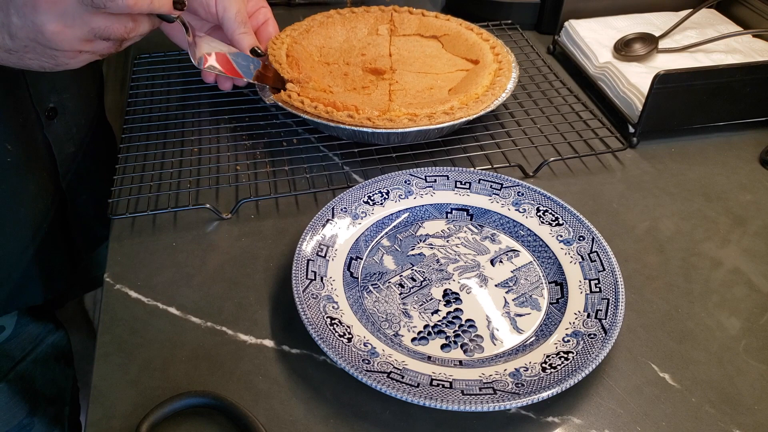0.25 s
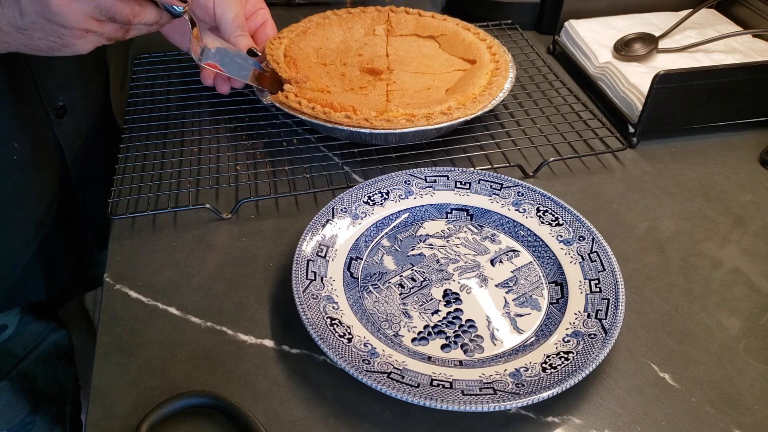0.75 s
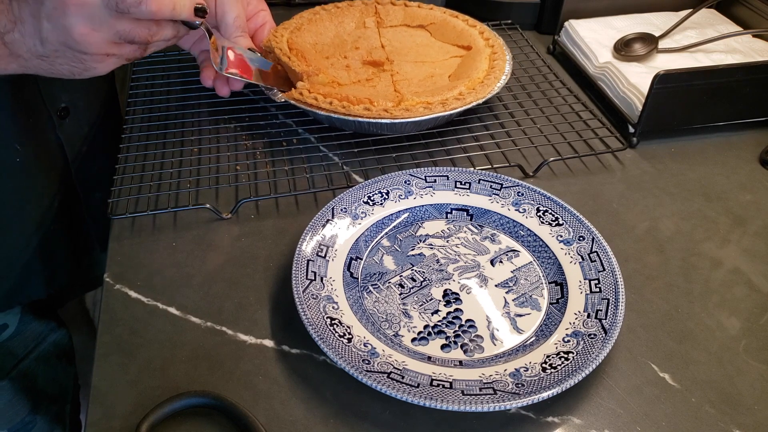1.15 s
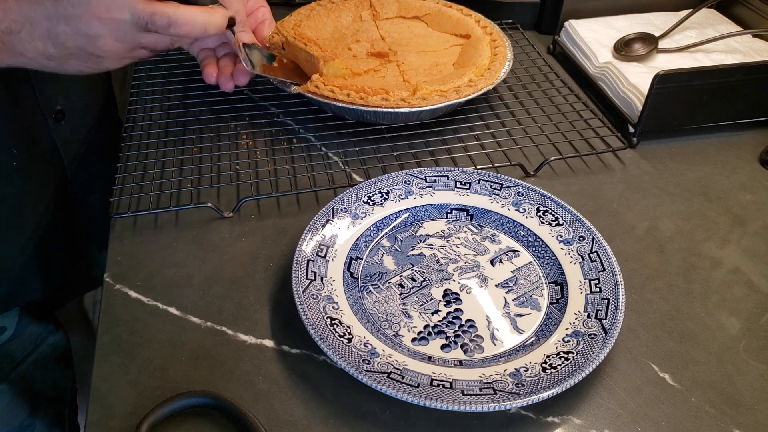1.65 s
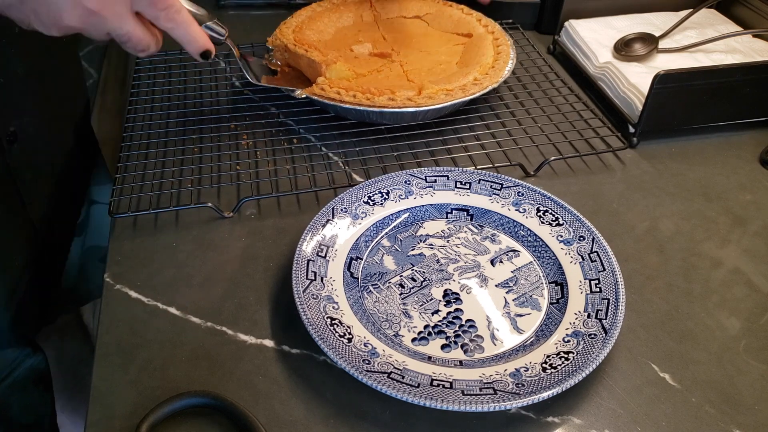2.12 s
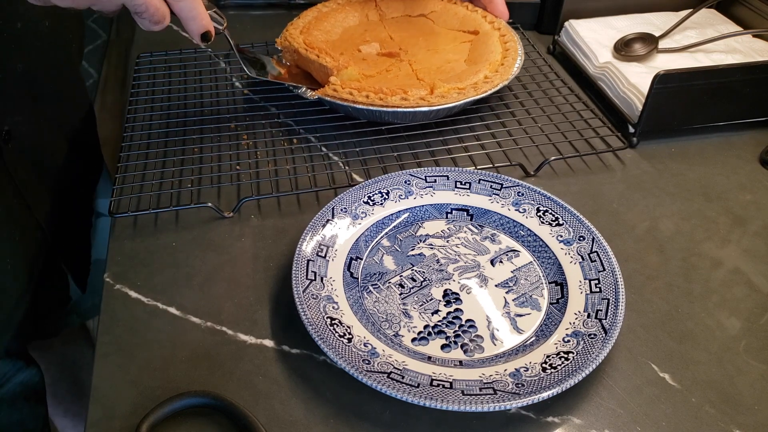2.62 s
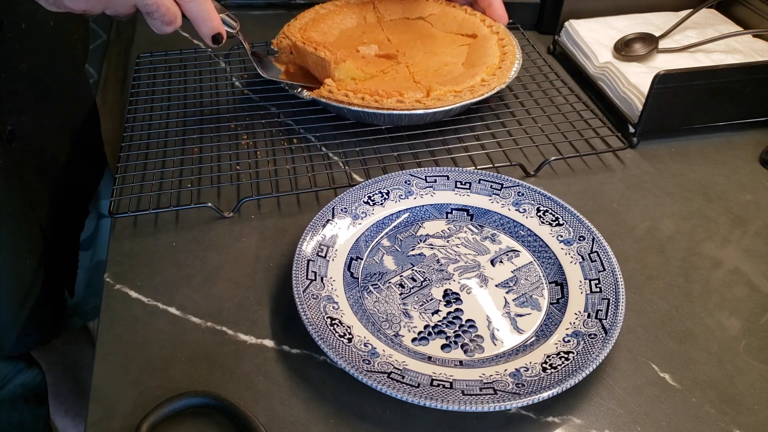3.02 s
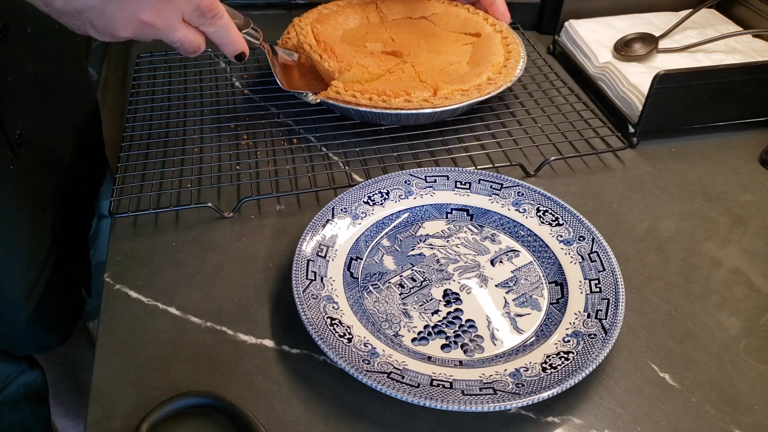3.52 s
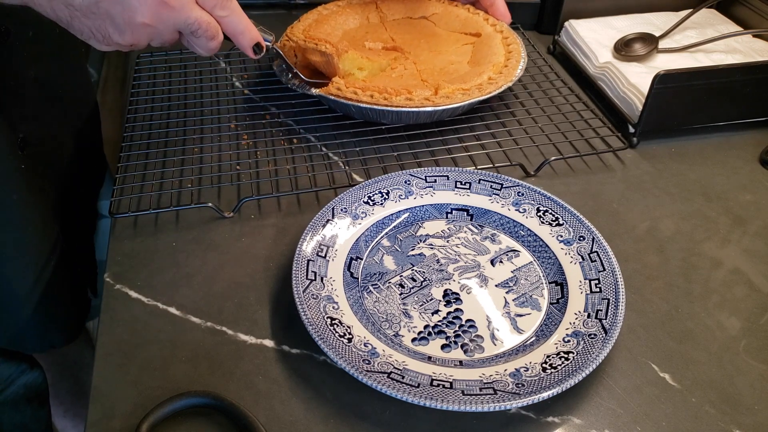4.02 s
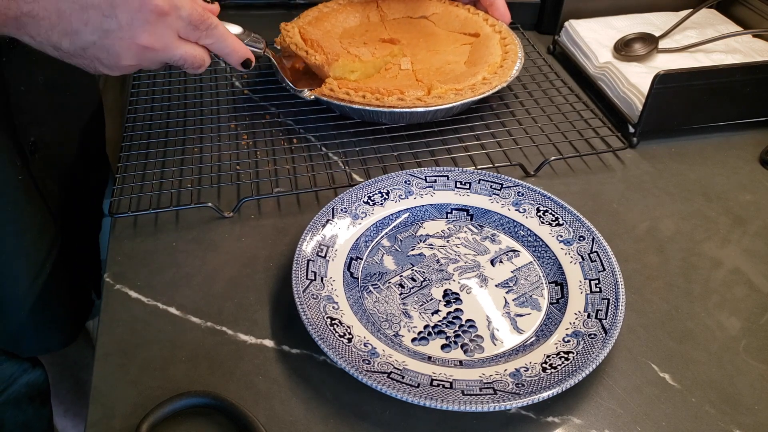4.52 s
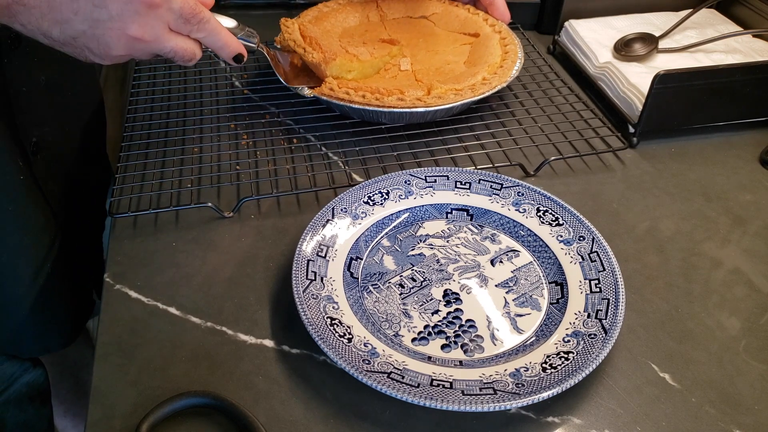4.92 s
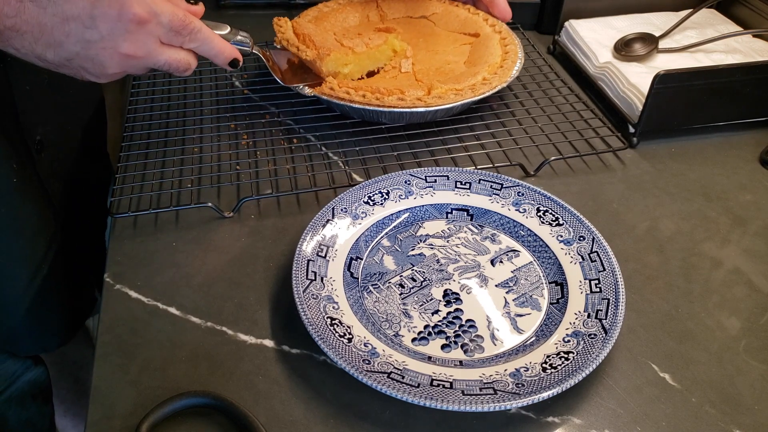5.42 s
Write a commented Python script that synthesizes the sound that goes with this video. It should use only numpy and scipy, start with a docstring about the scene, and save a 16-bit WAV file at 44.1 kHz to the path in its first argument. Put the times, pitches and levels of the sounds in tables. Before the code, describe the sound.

A metal server works under a slice of pie in a foil tin, close to the microphones and slightly left, in a quiet kitchen. It opens with a bright foil snap and a tiny steel clink. For the first two seconds, short scrapes crinkle the foil, hiss against the crust and break crumbs, dotted with sharp, irregular pops as dents flip. The blade squeaks very faintly on the rim, and the tin bumps softly on a wire rack. The strongest pop comes at about 2.2 seconds, followed by more scraping and smaller clicks. Another crisp snap lands at 3.2, a pop with a rack knock at 3.7, and two clear pops at 4.3 and 4.5. The scraping then dwindles to faint crust ticks, with a last small click around 5 seconds. The pops have a short room tail, and an appliance rumbles low throughout.

```python
"""A quiet kitchen, two microphones close to a pie in a foil tin, the tin a little to the left.
A metal server works under a slice: dents in the foil flip with a pop, and tiny slips of the blade
crinkle the foil, hiss on the crust and break crumbs. The blade sings on the rim, the tin bumps a rack.
The kitchen answers with a short tail, and an appliance rumbles low in the background."""
import sys
import numpy as np
from scipy import signal
from scipy.io import wavfile
from scipy.ndimage import uniform_filter1d

SR = 44100
rng = np.random.default_rng(int(sys.argv[2]) if len(sys.argv) > 2 else 0)


def inscribe(sig):
    """Save sig as 16-bit PCM at rate SR to the path in sys.argv[1].

    A 1-D sig is mono; a 2-D sig holds one channel per row.
    Samples are clipped to [-1, 1] before scaling.
    """
    pcm = np.round(np.clip(np.atleast_2d(sig).T, -1, 1) * 32767)
    wavfile.write(sys.argv[1], SR, pcm.astype(np.int16))


N = 249515
LEAD_SAMPLES = 4  # the left microphone hears the tin first
SHADE_DB = -2  # the camera body shades the left microphone from hiss and snaps


def gain_of(db):
    """Decibels to gain."""
    return 10 ** (np.asarray(db) / 20)


def unit_rms(x):
    """Scales to rms 1."""
    return x / np.sqrt(np.mean(x ** 2) + 1e-20)


def curve_at(points, hz):
    """Reads a table on a log-frequency axis."""
    f, value = np.transpose(points)
    return np.interp(np.log(hz + 1), np.log(f + 1), value)


def colour(x, spectrum, modes=()):
    """Minimum-phase filter of unit energy: a spectrum with resonance peaks on it."""
    hz = abs(np.fft.fftfreq(4096, 1 / SR))
    db = curve_at(spectrum, hz) + sum(top / (1 + (2 * (hz - f) / width) ** 2) for f, width, top in modes)
    log_gain = np.log(gain_of(np.maximum(db, -100)))
    taps = np.fft.ifft(np.exp(log_gain - 1j * signal.hilbert(log_gain).imag)).real[:2048]
    taps = taps.reshape((1,) * (x.ndim - 1) + (-1,)) / np.linalg.norm(taps)
    return signal.oaconvolve(x, taps, axes=-1)[..., :x.shape[-1]]


def slow_noise(shape, samples):
    """Noise smoothed twice over so many samples."""
    return uniform_filter1d(uniform_filter1d(rng.standard_normal(shape), samples), samples)


def add(mix, start_s, sound):
    """Mixes a sound in; a mono one reaches both microphones alike."""
    sound = np.atleast_2d(sound)
    part = mix[:, round(start_s * SR):][:, :sound.shape[1]]
    part += sound[:, :part.shape[1]]


# The kitchen at rest. Each row: frequency in Hz, relative level in dB.
ROOM_SPECTRUM = [(8.8, -39), (15, -41.5), (36, -18), (74, -2), (195, -15.5), (276, -18), (310, -19.5),
                 (453, -28.5), (494, -28.5), (787, -26.5), (1120, -33), (1210, -21), (1320, -31),
                 (1490, -38), (3790, -47.5), (7850, -68), (15800, -41.5)]
# How alike the microphones hear it. Each row: frequency in Hz, correlation.
ROOM_LIKENESS = [(60, 1), (180, 0.82), (550, 0.51), (1650, -0.72), (4970, 0.11), (15000, 0.026)]
# Which way it leans. Each row: frequency in Hz, left over right in dB.
ROOM_BALANCE = [(60, -2.0), (240, -4), (950, 4), (3770, 3.0), (15000, 4)]


def room_tone(level_db=-45, motor_hz=117, motor_width_hz=26, motor_db=10):
    """Rumble and faint hiss, nearly mono in the bass; an appliance's motor raises one narrow band."""
    frames, hz = N // 512 + 5, np.fft.rfftfreq(2048, 1 / SR)
    a, b, c, d, flicker = rng.standard_normal((frames, 1025, 5)).T
    flicker_db = 1.08 * unit_rms(uniform_filter1d(uniform_filter1d(flicker, 12, 0), 8, 1))
    likeness = np.clip(curve_at(ROOM_LIKENESS, hz), -1, 1)[:, None]
    left = a + 1j * b
    right = likeness * left + np.sqrt(1 - likeness ** 2) * (c + 1j * d)
    side_db = np.array([.5, -.5])[:, None, None] * curve_at(ROOM_BALANCE, hz)[:, None]
    hum_db = motor_db / (1 + (2 * (hz - motor_hz) / motor_width_hz) ** 2)
    band_db = (curve_at(ROOM_SPECTRUM, hz) + hum_db)[:, None]
    spectra = np.array([left, right]) * gain_of(band_db + side_db + flicker_db)
    return gain_of(level_db) * unit_rms(signal.istft(spectra, nperseg=2048, noverlap=1536)[1][:, :N])


# The kitchen's tail. Each row: frequency in Hz, seconds to fall 60 dB.
TAIL_DECAY = [(500, 0.41), (1500, 0.32), (4000, 0.49), (12000, 0.24)]
# Counter, plate and wall, close by. Each row: delay in seconds, level in dB.
NEAR_ECHOES = [(.003, -13), (.008, -11.5), (0.0156, -13.5), (.023, -26)]


def kitchen_reverb(x):
    """A few near echoes, and sparse reflections of random sign, each band dying at its own speed."""
    taps = np.zeros((2, SR // 2))
    arrivals = np.arange(400, SR // 2 - 20, 20) + rng.integers(0, 20, (2, (SR // 2 - 401) // 20))
    np.put_along_axis(taps, arrivals, rng.choice([-1., 1.], arrivals.shape), 1)
    hz, t, spectra = signal.stft(taps, SR, nperseg=256)
    decay = gain_of(-60 * t / curve_at(TAIL_DECAY, hz)[:, None])
    tail = signal.istft(spectra * decay, SR, nperseg=256)[1]
    tail *= gain_of(-11) / np.linalg.norm(tail[0])
    for delay_s, db in NEAR_ECHOES:
        delays = np.round(delay_s * SR * rng.uniform(.95, 1.05, 2)).astype(int)
        tail[[0, 1], delays] += gain_of(db)
    return signal.fftconvolve(x, tail, axes=1)[:, :N]


# The wire rack under the tin. Each row: start in seconds, level in dB.
RACK_BUMPS = [(0.056, -38), (0.317, -43), (0.614, -41), (0.695, -36), (1.124, -35.5), (1.303, -39),
              (1.672, -46), (2.653, -41), (2.956, -46), (3.555, -34), (3.661, -26.5), (4.294, -39)]


def rack_bump(db, hz=520, t60=.022):
    """The tin bumps the rack: a short low thump."""
    t = np.arange(2000) / SR
    return np.sin(2 * np.pi * hz * t) * gain_of(db - 60 * t / t60) * (1 - np.exp(-t / .00063))


# The server's steel modes. Each row: pitch in Hz, relative level in dB, seconds to fall 60 dB.
STEEL_MODES = [(6130, 4, 0.036), (9300, -7, .05), (12100, -14, .04), (14600, -15, 0.037)]


def server_clink(level_db):
    """A ring taps the server once and its modes die away."""
    t = np.arange(3000) / SR
    modes = sum(gain_of(db - 60 * t / t60) * np.sin(2 * np.pi * hz * t) for hz, db, t60 in STEEL_MODES)
    return gain_of(level_db) * modes


# At the rim of the tin. Each row: start and end in seconds, pitch in Hz, level in dB.
RIM_SQUEAKS = [(.135, 0.201, 1492, -47), (.7, 0.794, 12500, -71.5), (0.722, 1.102, 8300, -72),
               (1.097, 1.26, 8180, -61.5), (2.197, 2.323, 4370, -64)]


def rim_squeak(start_s, end_s, hz, db):
    """The blade sings on the rim, thin and wavering: slow noise carried on one pitch."""
    t = np.arange(start_s, end_s, 1 / SR)
    a, b = slow_noise((2, 2, len(t)), 180)
    tone = a * np.cos(2 * np.pi * hz * t) + b * np.sin(2 * np.pi * hz * t)
    return gain_of(db) * unit_rms(tone) * signal.windows.tukey(len(t), .4)


# The crust up close. Each row: start in seconds, centre in Hz, level in dB, seconds to fall 60 dB.
CRUST_TICKS = [(3.811, 14000, -44, .05), (3.915, 7800, -60.5, 0.32), (3.996, 11800, -54, .04),
               (4.42, 12000, -54, .02), (4.782, 11000, -56.5, 0.033), (5.096, 15000, -43.5, .07)]


def crust_tick(hz, db, t60):
    """A flake of crust snaps: a dying puff of noise in one high band."""
    t = np.arange(5000) / SR
    band = [(.6 * hz, -40), (.9 * hz, -4), (1.22 * hz, -4), (1.8 * hz, -30)]
    return colour(rng.standard_normal((2, len(t))), band) * gain_of(db - 60 * t / t60)


# The patch of foil under the blade. Each row: time in seconds, pitch in Hz.
PATCH_PITCH = [(0.0, 1500), (0.35, 1380), (0.49, 1830), (0.84, 1210), (1.01, 1440), (1.28, 1190),
               (1.32, 1600), (1.67, 1130), (1.83, 1560), (2.41, 1280), (2.49, 1920), (2.57, 1320),
               (2.65, 1950), (2.76, 1410), (2.91, 1700), (3.09, 1290), (5.61, 1160), (5.66, 1270)]


def patch_ring(x, width_hz=380):
    """A resonance that glides as the bending foil tightens and slackens."""
    hz = np.interp(np.arange(N) / SR, *np.transpose(PATCH_PITCH))
    carrier = np.exp(2j * np.pi * np.cumsum(hz) / SR)
    pole = np.exp(-np.pi * width_hz / SR)
    # shift down to 0 Hz, smooth, shift back
    return 2 * (carrier * signal.lfilter([1 - pole], [1, -pole], x / carrier)).real


# The server's pushes. Each row: start, rise and hold in seconds, crinkle and hiss levels in dB.
BLADE_STROKES = [(0.0, .002, .005, -41, -44), (0.11, .17, .09, -47, -49), (0.47, .06, .12, -49, -52),
                 (0.675, .02, .07, -44, -47), (0.88, .02, .38, -50, -55), (1.04, .03, .01, -48, -50),
                 (1.28, .03, .01, -43, -52), (1.44, .04, .02, -54, -60), (1.655, .015, .005, -51, -40),
                 (1.79, .02, .02, -55, -52), (2.045, .015, .12, -45.5, -50), (2.17, .02, .05, -46, -42),
                 (2.37, .075, .005, -60, -52), (2.495, .02, .12, -51, -56), (2.73, .05, .015, -45, -45),
                 (2.79, .05, .11, -46, -51), (2.96, .01, .14, -56, -61), (3.23, .02, .14, -48, -54),
                 (3.49, .065, .09, -50, -58), (3.64, .02, .02, -41, -51), (3.82, .04, .01, -58, -57),
                 (4.175, .035, .005, -50, -54), (4.3, .015, .02, -47, -52), (4.43, .03, .01, -53, -60),
                 (4.47, .02, .01, -46, -45), (4.645, .005, .03, -58, -57), (4.71, .03, .05, -56, -66),
                 (4.985, .01, .01, -53, -57), (5.61, .015, .04, -64, -58)]


def stroke_level(rest_db, tops_db, fall_db_per_s):
    """Level in dB: each stroke rises, holds and falls; the loudest, or the resting blade, is heard."""
    t, level_db = np.arange(0, N, 32) / SR, rest_db[::32]
    for (start, rise, hold, *_), top_db in zip(BLADE_STROKES, tops_db):
        rise_db = np.where(t < start, -200, -16 * np.clip(1 - (t - start) / (rise + 1e-4), 0, 1))
        fall_db = fall_db_per_s * np.maximum(t - start - rise - hold, 0)
        level_db = np.maximum(level_db, top_db + rise_db - fall_db)
    return np.interp(np.arange(N) / SR, t, level_db)


def slips(per_s, spread_db):
    """Tiny slips of the blade: random clicks of random sign, a few of them large."""
    size = gain_of(spread_db * np.minimum(rng.exponential(1, N), 4)) * rng.choice([-1., 1.], N)
    return size * (rng.random(N) < per_s / SR)


# The blade resting on the pie, easing off. Each row: time in seconds, crinkle, hiss and crumbs in dB.
RESTING_BLADE = [(0.0, -54, -62, -50), (0.15, -54, -63, -55), (0.69, -53, -61, -57), (1.13, -55, -62, -55),
                 (1.39, -57, -64, -78), (1.6, -57, -67, -72), (1.95, -60, -68, -78), (2.49, -58, -65, -69),
                 (2.82, -58, -66, -61), (3.04, -60, -67, -77), (3.45, -57, -69, -74), (3.72, -56, -60, -70),
                 (4.15, -70, -73, -78), (4.7, -60, -65, -78), (4.95, -70, -73, -77), (5.2, -66, -69, -76),
                 (5.66, -72, -72, -75)]
# Foil, blade and crust at close range. Each row: frequency in Hz, relative level in dB.
CRINKLE_SPECTRUM = [(240, -59), (400, -10), (620, -9), (845, -12.5), (1050, -6), (1310, -2.5), (1420, -6.5),
                    (1950, -10), (2240, -13), (2700, -9), (3900, -39), (6000, -33), (7800, -63),
                    (13200, -120)]
HISS_SPECTRUM = [(2650, -18.5), (4500, -3.5), (6890, -2.5), (9440, -6), (11800, -2), (13100, -2),
                 (14500, 2.5), (15800, -5.5)]
CRUMB_SPECTRUM = [(1800, -43), (2800, -1.5), (4000, -6), (5500, -8), (8000, -24)]
# The tin's resonances. Each row: centre and width in Hz, boost in dB.
TIN_MODES = [(987, 71, 0), (1310, 17, 0), (1466, 22, 5), (1690, 38, 1), (1798, 19, 6.5), (2180, 52, 8.5)]


def blade_scrape():
    """Sparse slips crinkle the foil and break crumbs; dense ones hiss on the crust."""
    def layer(level_db, spectrum, per_s, spread_db, apart, modes=(), left_db=0):
        """Both microphones hear one set of slips, and each its own, weighted by apart."""
        shared = slips(per_s, spread_db)
        pair = np.array([shared + apart * slips(per_s, spread_db) for _ in range(2)])
        pair = unit_rms(colour(pair, spectrum, modes))
        if modes:
            pair = unit_rms(pair + gain_of(-2) * patch_ring(pair))
        catch_db = 1.6 * unit_rms(slow_noise(N, 500))  # the drag catches and lets go
        return gain_of(level_db + catch_db + np.array([[left_db], [0]])) * pair

    times, *resting = np.transpose(RESTING_BLADE)
    crinkle_rest, hiss_rest, crumb_db = (np.interp(np.arange(N) / SR, times, db) for db in resting)
    crinkle_tops, hiss_tops = np.transpose(BLADE_STROKES)[3:]
    crinkle_db = stroke_level(crinkle_rest, crinkle_tops, fall_db_per_s=140)
    hiss_db = stroke_level(hiss_rest, hiss_tops, fall_db_per_s=200)
    crinkle = layer(crinkle_db, CRINKLE_SPECTRUM, per_s=2600, spread_db=3.8, apart=.9, modes=TIN_MODES)
    hiss = layer(hiss_db, HISS_SPECTRUM, per_s=6000, spread_db=3.2, apart=1.4, left_db=SHADE_DB)
    crumbs = layer(crumb_db, CRUMB_SPECTRUM, per_s=800, spread_db=5, apart=1.2)
    return crinkle + hiss + crumbs


def creases(low_hz, high_hz, width_share, db, count):
    """Chance resonances of one creased patch of foil."""
    centres = low_hz * (high_hz / low_hz) ** rng.random(count)
    return [(hz, width_share * hz, db) for hz in centres]


# A pop's midrange click and treble snap. Each row: frequency in Hz, relative level in dB.
CLICK_SPECTRUM = [(600, -34), (950, -1), (1300, 7), (2000, 4.5), (2500, -8.5), (3400, -13), (5000, -48),
                  (9000, -70)]
SNAP_SPECTRUM = [(1530, -44), (2600, -11), (3290, 1), (5920, -5.5), (6680, -8.5), (9820, -7), (10800, -1.5),
                 (13500, -6), (14900, 0), (15800, 5.5)]
# The foil, right by the microphones. Each row: start in seconds, dent strength in dB, pitch in Hz,
# click level in dB, snap level in dB, left over right in dB.
FOIL_POPS = [(0.044, -21, 2360, -46, -28.5, 0.5), (0.056, -25, 1016, -41, -57, 1),
             (0.132, -42, 1470, -56, -48, 2), (0.317, -33, 1000, -47.5, -58, 3),
             (0.422, -31, 1580, -43, -52, 2), (0.478, -28.5, 1835, -40, -35, 1.5),
             (0.546, -24, 1746, -32, -33.5, 1), (0.614, -38, 1710, -42, -54, 0),
             (0.641, -29, 2310, -51, -42, -1), (0.695, -26, 1370, -35, -32.5, -1),
             (0.73, -23, 1146, -32, -57, -3), (0.742, -22, 1094, -38, -44, 5),
             (0.872, -30, 1130, -50.5, -60, 4), (0.898, -31, 1460, -41, -47.5, 6),
             (1.073, -46, 1480, -44, -42, 3), (1.124, -28, 700, -53, -57, -9),
             (1.252, -17, 1082, -31, -65, 0), (1.303, -27, 940, -36, -48, 0),
             (1.314, -25, 1806, -44, -43, -4), (1.462, -38, 1450, -49, -64, 2),
             (1.672, -33, 1060, -52, -43.5, 5), (1.753, -48, 1200, -66, -42, 5),
             (1.776, -24, 1410, -34, -44, 4), (1.789, -40, 1430, -26, -29, -1),
             (2.061, -24, 1090, -38.5, -44, 1), (2.116, -22, 1330, -37, -40, 1),
             (2.187, -3, 1310, -27, -23, 1), (2.199, -26, 1600, -48, -55, 0),
             (2.216, -28, 1500, -50, -58, 0), (2.445, -34, 1386, -50.5, -43, -8),
             (2.489, -19, 1840, -35, -36.5, 0), (2.558, -40, 1520, -37, -48, -2),
             (2.654, -20, 2030, -33, -49, 2), (2.733, -34, 1664, -44, -53, 1),
             (2.738, -28, 1500, -41, -55, 1), (2.955, -28, 900, -42, -50, 2.5),
             (2.958, -22, 2000, -34, -37.5, 2.5), (3.104, -29, 1280, -49.5, -59, 4),
             (3.23, -38, 1100, -31.5, -29, -2), (3.344, -22, 1255, -43.5, -45.5, 0),
             (3.374, -31, 1100, -52, -57, -3), (3.556, -23, 1270, -44.5, -48.5, -0.5),
             (3.616, -30, 980, -57, -65, -1), (3.647, -28, 973, -42, -54, -2),
             (3.654, -27, 1150, -42, -54, -2), (3.661, -19, 1170, -25.5, -32, 0.5),
             (4.213, -25, 1084, -52, -57, -3), (4.2946, -9.5, 1305, -33, -31, 0),
             (4.461, -32, 1090, -57, -53, -1), (4.49, -17, 1070, -36, -30.5, 0.5),
             (4.645, -21, 1296, -50, -42, 2.5), (4.995, -26, 1116, -46, -49.5, 4),
             (4.997, -42, 2050, -55, -60, 4)]


def foil_pop(start_s, dent_db, hz, click_db, snap_db, pan_db):
    """A dent flips: it rings a few cycles, clicks, rattles the foil and snaps in the treble."""
    t = np.arange(4000) / SR
    t60 = .012 - .0002 * dent_db  # weaker dents ring a little longer
    ring = np.sin(2 * np.pi * hz * t) * gain_of(dent_db - 60 * t / t60) * (1 - np.exp(-(t / .0009) ** 2))
    # thin foil radiates little bass
    ring = signal.sosfilt(signal.butter(2, .57 * hz, "high", fs=SR, output="sos"), ring)
    # the crease tears along its length for a millisecond or two
    tear = rng.standard_normal((3, len(t))) * t * np.exp(-t / .00055)
    kick = colour(tear[0] + .63 * tear[1:], CLICK_SPECTRUM)
    noise = rng.standard_normal((4, len(t)))
    rattle = colour(noise[:2], CLICK_SPECTRUM, TIN_MODES + creases(1000, 2300, .07, db=7, count=4))
    rattle *= gain_of(-5 - 60 * t / .078) * (1 - np.exp(-t / .0013))
    click = (kick / np.std(kick[:, :300]) + rattle) * gain_of(click_db)
    body = (3800, 2600, 3.5 - 2.3 * start_s)  # the snaps thin out as the blade goes under the slice
    snap = colour(noise[2:], SNAP_SPECTRUM, creases(2940, 14900, .14, db=4, count=5) + [body])
    fade = (gain_of(-60 * t / .014) + .16 * gain_of(-60 * t / .063)) * (1 - np.exp(-(t / .0011) ** 2))
    fade /= np.sqrt(np.mean(fade[:400] ** 2))
    snap = snap + .12 * snap[::-1]  # each microphone hears a little of the other's snap
    snap *= fade * gain_of(snap_db + np.array([[SHADE_DB], [0]]))
    return (ring + click + snap) * gain_of([[pan_db / 2], [-pan_db / 2]])


def scene():
    """The tin's short sounds with their echoes, the dry scrape, and the room behind."""
    hits = np.zeros((2, N))
    for start_s, *dent in FOIL_POPS:
        add(hits, start_s, foil_pop(start_s, *dent))
    for start_s, db in RACK_BUMPS:
        add(hits, start_s, rack_bump(db))
    for start_s, *squeak in RIM_SQUEAKS:
        add(hits, start_s, rim_squeak(start_s, *squeak))
    for start_s, *flake in CRUST_TICKS:
        add(hits, start_s, crust_tick(*flake))
    add(hits, .04, server_clink(level_db=-36))
    tin = hits + kitchen_reverb(hits) + blade_scrape()
    tin[1] = np.roll(tin[1], LEAD_SAMPLES)
    return tin + room_tone()


def record(dry):
    """Both microphone channels are cut off steeply above 16 kHz."""
    lowpass = signal.firwin(1023, 16000, window=("kaiser", 9), fs=SR)
    return signal.oaconvolve(dry, lowpass[None], "same")


dry = scene()
out = record(dry)
inscribe(out)
```